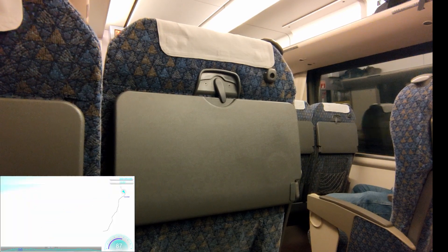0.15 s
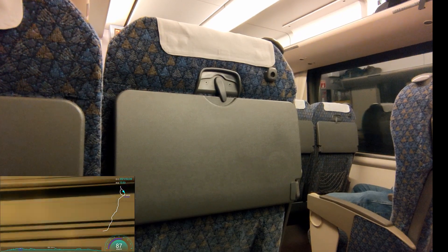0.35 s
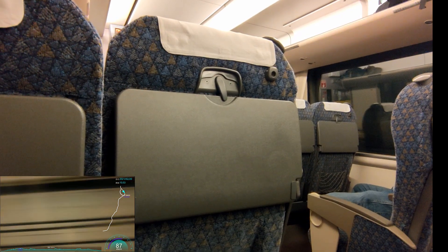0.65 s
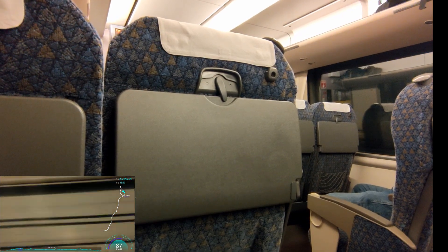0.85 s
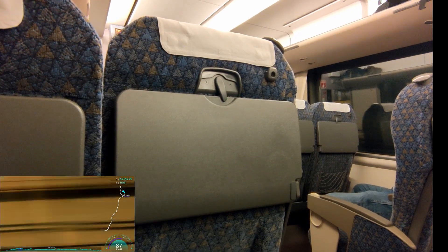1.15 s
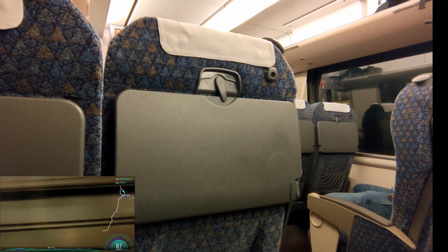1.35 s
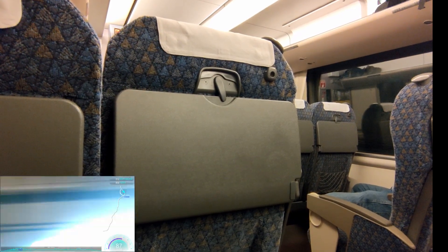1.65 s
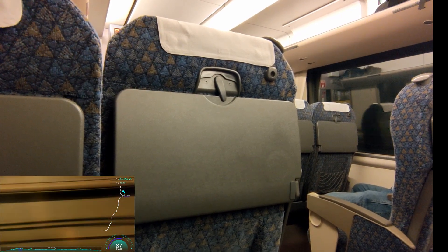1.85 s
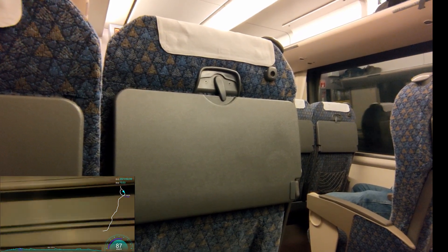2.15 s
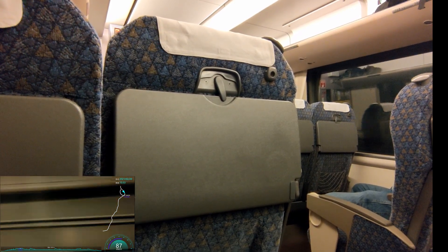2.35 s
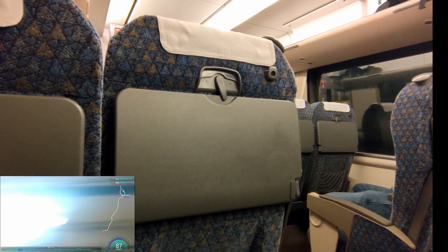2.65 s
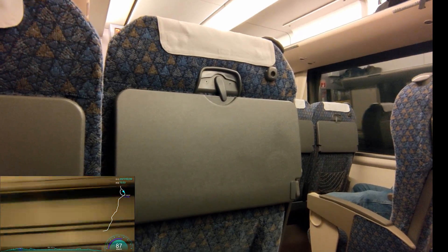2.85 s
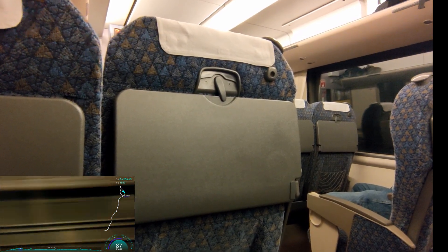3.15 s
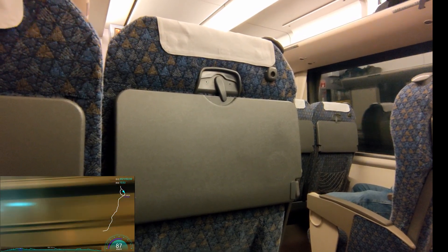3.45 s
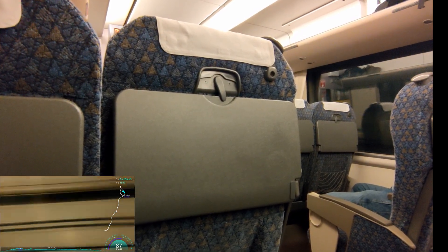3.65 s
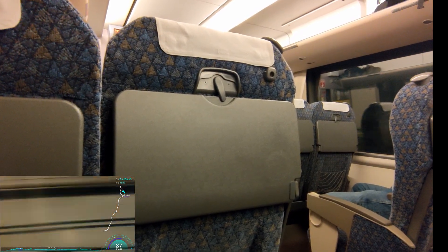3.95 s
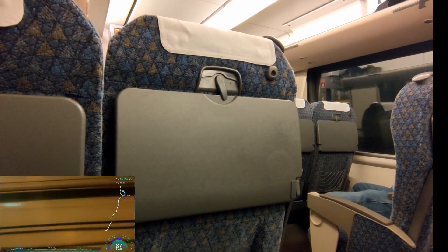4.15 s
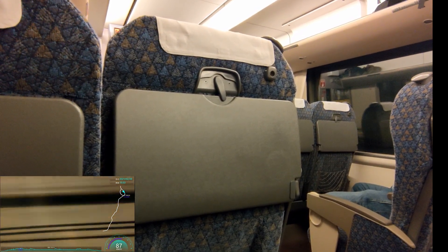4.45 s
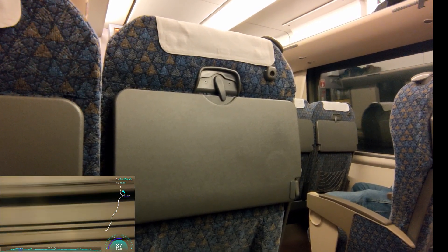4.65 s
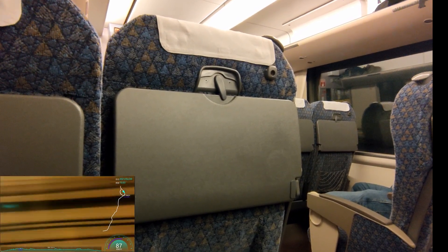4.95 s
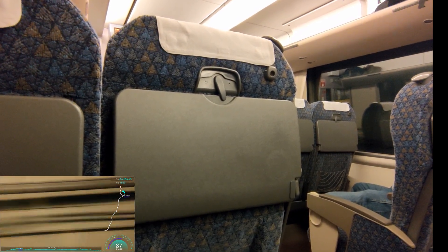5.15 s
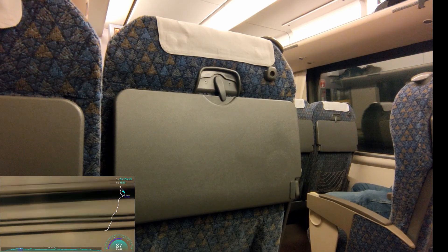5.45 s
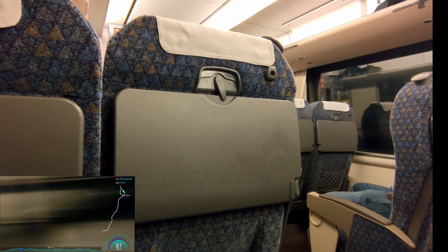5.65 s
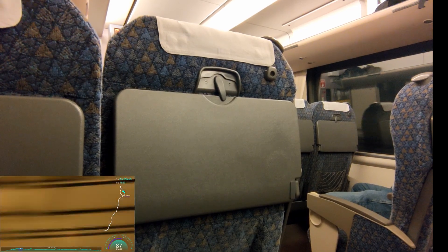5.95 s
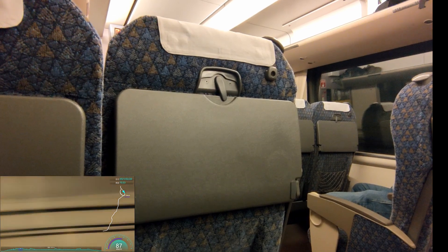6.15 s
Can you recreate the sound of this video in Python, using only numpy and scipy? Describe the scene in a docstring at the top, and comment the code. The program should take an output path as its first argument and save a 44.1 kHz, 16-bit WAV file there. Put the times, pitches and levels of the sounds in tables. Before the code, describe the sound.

Heard from a seat inside an enclosed passenger car at speed, wheels howl with a wavering midrange singing tone over deep body rumble. Worn rail makes the roar surge and groan, strongest just before two seconds, with scraping, a short rough squeal and a heavy soft knock. Further surges follow, then the howl thins and the ride smooths, leaving rumble, soft air hiss and dull knocks. Close stereo pickup, diffuse cabin sound.

```python
"""Inside a passenger car of a train at speed

Rail roughness drives the wheels and track, which roar and howl through the floor as shaped noise over a steady
body rumble; corrugated rail makes the howl sing as wavering tones, and the track gradually grows smoother.
Worn patches swell the roar and groan, some scrape and one squeals in rough, short tones. The bogie knocks
with decaying floor modes; booms, chirps and a tick are bursts of narrow noise, and faint squeaks sit in the hiss.
"""
import sys
import numpy as np
from scipy import signal
from scipy.fft import rfft, irfft, next_fast_len
from scipy.io import wavfile
from scipy.ndimage import uniform_filter1d, minimum_filter1d, map_coordinates

SR = 44100
rng = np.random.default_rng(int(sys.argv[2]) if len(sys.argv) > 2 else 0)


def int16_out(signal):
    """Quantize to a 16-bit WAV file."""
    q = np.round(np.clip(np.atleast_2d(signal).T, -1, 1) * 32767)
    wavfile.write(sys.argv[1], SR, q.astype(np.int16))


N = 277819
T = np.arange(N) / SR
FFT_SIZE = next_fast_len(N, real=True)
HZ = np.maximum(np.arange(FFT_SIZE // 2 + 1) * SR / FFT_SIZE, 1)
LEFT_RIGHT = np.array([[1], [-1]])  # sign of a difference between the ears


def undb(db):
    """Amplitude ratio: 20 dB is a factor of ten in gain."""
    return 10 ** (np.asarray(db) / 20)


def together(*levels_db):
    """Incoherent addition: the powers of unrelated sounds add; the result is in dB."""
    return 10 * np.log10(sum(undb(db) ** 2 for db in levels_db))


def unit(pair):
    """Normalisation: scale a stereo pair so that the mean of its ears has rms 1."""
    return pair / np.sqrt(np.mean(pair.mean(axis=0) ** 2))


def over_time(table, axis=1):
    """Linear interpolation: one column of a table whose first column is time."""
    columns = np.transpose(table)
    return np.interp(T, columns[0], columns[axis])


def over_hz(table, axis=1):
    """Spectral interpolation: one column of a table, joined on a log-frequency axis."""
    columns = np.transpose(table)
    return np.interp(np.log(HZ), np.log(columns[0]), columns[axis])


def resonance(hz, width_hz):
    """Damped mode with steep skirts: the gain halves about width_hz to either side of the centre."""
    detuning = (HZ ** 2 - hz ** 2) / (HZ * width_hz) / 2
    return 1 / (1 + detuning ** 2)


def walk(rate):
    """Smoothed random modulation: levels held 1 / rate s and slewed twice, with a spread of 1."""
    hold = int(SR / rate)
    steps = rng.standard_normal(1024)[np.arange(N) // hold % 1024]
    smooth = uniform_filter1d(uniform_filter1d(steps, hold), hold)
    return smooth / smooth.std()


def flare(centre_s, half_length_s):
    """Gaussian envelope: a gain that rises and falls in a bell around one moment."""
    return np.exp(-2 * ((T - centre_s) / half_length_s) ** 2)


def stretches(table, attack_s, release_s):
    """Exponential build-up and decay: level in dB as wheels run onto each stretch of rail and off again."""
    power = 1e-12
    for start_s, length_s, level_db in table:
        onto = 1 - np.exp(-np.maximum(T - start_s, 0) / attack_s)
        off = np.exp(-np.maximum(T - start_s - length_s, 0) / release_s)
        power = power + (undb(level_db) * onto * off) ** 2
    return 10 * np.log10(power)


def cabin_noise(gain):
    """Interaural coherence: random vibration of this spectrum, alike at the ears in the bass, diffuse above."""
    # standing waves of the cabin at the two ears: freq_hz, correlation (-1 to 1), left_minus_right_db
    cabin = [(40, 1, 4.5), (210, 0.88, 4), (290, 0.78, 1), (414, 0.49, 6.5), (500, 0.42, 3),
             (770, -0.016, 0), (920, 0.48, -0.5), (1215, -0.87, 5.5), (1900, 0.73, 0), (2450, -0.1, -1),
             (3200, 0.03, -3), (5700, -0.095, -3.5), (7700, -0.14, -9.5), (9100, -0.03, 18)]
    mid, side = rfft(rng.standard_normal((2, FFT_SIZE)))
    alike = np.clip(over_hz(cabin), -.9, .995)
    pair = mid + LEFT_RIGHT * side * np.sqrt((1 - alike) / (1 + alike))
    lean = undb(LEFT_RIGHT * over_hz(cabin, axis=2) / 2)
    spectrum = pair * gain * lean / lean.mean(axis=0)
    return unit(irfft(spectrum, FFT_SIZE)[:, :N])


def band(spectrum, level_db, even_s):
    """Averaging over many wheels: a group of resonances whose power is evened out over even_s."""
    noise = cabin_noise(undb(over_hz(spectrum)))
    window = int(even_s * SR) + 1
    power = np.mean(noise ** 2, axis=0)
    power = uniform_filter1d(uniform_filter1d(power, window), window)
    return unit(noise / np.sqrt(power)) * undb(level_db)


def shifting(pair, speed):
    """Variable-rate reading: move a sound's resonances up and down by a changing ratio."""
    place = np.cumsum(speed)
    return np.array([map_coordinates(ear, [place], order=1, mode="mirror") for ear in pair])


def singing(hz, pan_db, wander_hz):
    """Frequency and amplitude modulation: a wavering tone that sways between the ears as the car rocks."""
    flutter_db = 0.73 * walk(81)  # uneven ripples shake the tone
    turn = 2 * np.pi * np.cumsum(hz + wander_hz * walk(30)) / SR
    lag = 0.057 + 0.62 * walk(2.9)  # half the phase difference between the ears, radians
    return np.sqrt(2) * np.sin(turn + LEFT_RIGHT * lag) * undb(LEFT_RIGHT * pan_db / 2 + flutter_db)


def cries(table, jitter_hz, jitter_rate):
    """Unsteady tones: short pitches, some gliding, all jittered at random, that flare and fade."""
    out = np.zeros((2, N))
    for centre_s, half_length_s, pitch_hz, glide, level_db, pan_db in table:
        hz = pitch_hz + glide * (T - centre_s) + jitter_hz * walk(jitter_rate)
        out += singing(hz, pan_db, wander_hz=5) * flare(centre_s, half_length_s) * undb(level_db)
    return out


def swells(table):
    """Transient resonance: narrow bands of noise that flare and fade."""
    return sum(cabin_noise(resonance(hz, width_hz)) * flare(centre_s, half_length_s) * undb(level_db)
               for centre_s, half_length_s, hz, width_hz, level_db in table)


def track_roar(worn_db):
    """Forced vibration of rail and sleepers: a lumpy roar whose resonance shifts with track-bed stiffness."""
    # resonances of rail and sleepers: freq_hz, relative level_db per Hz
    spectrum = [(160, -44), (280, -14), (312, -9.5), (345, -5.5), (403, -3), (440, 3.5), (478, 5), (530, 3),
                (579, -5), (630, 0), (820, -49.5), (1390, -120)]
    # resonance of the roar along the track: time_s, centre_hz
    centre = [(0, 479), (.95, 463.9), (1.48, 478.8), (1.6, 444.8), (1.7, 496), (1.9, 488.8), (2.35, 499.3),
              (2.55, 463.7), (2.85, 476.8), (3.1, 486.3), (3.45, 434.6), (3.7, 479), (6.3, 471.6)]
    rest_hz = 477.8  # centre on average track
    roar = shifting(band(spectrum, 0, even_s=0.099), over_time(centre) / rest_hz)
    lumps_db = 1.1 * walk(37)  # flicker as the sleepers pass
    smooth_track_db = -29.5  # roar between the worn patches
    return unit(roar * undb(lumps_db)) * undb(together(smooth_track_db, worn_db))


def sleepers(worn_db):
    """Nonlinear growth: on badly worn track the sleepers bounce, a deep roar that grows faster than the wear."""
    noise = cabin_noise(resonance(hz=381, width_hz=79))
    return noise * undb(-0.5 + 1.367 * worn_db)


def wheel_howl(roughness_db, worn_db, tone_db, dip_db):
    """Energy sharing: roughness makes the wheels howl, and on corrugated rail the tone takes part of the power."""
    # howling resonances of the wheels: freq_hz, relative level_db per Hz
    spectrum = [(350, -41.5), (590, -17), (640, -3.5), (695, 2.5), (725, -0.5), (791, -4.5), (855, -6),
                (915, -15.5), (955, -24), (1005, -19), (1240, -46.5), (2090, -120)]
    howl_db = together(-16 + roughness_db, -9.5 + worn_db)  # heavy wear also drives the howl
    tone_share = np.minimum(undb(tone_db - howl_db) ** 2, .6)
    howl = band(spectrum, howl_db + dip_db, even_s=0.028) * np.sqrt(1 - tone_share)
    overtone = cabin_noise(resonance(hz=1421, width_hz=55)) * undb(howl_db - 27.5)
    return howl + overtone


def corrugation(tone_db):
    """Ripple-passing frequency: evenly spaced ripples make wheels sing at speed over spacing; two wheels beat."""
    # the tone sinks as the train loses a little speed, rises in part, and comes from either rail:
    # time_s, pitch_hz, left_minus_right_db
    sing = [(0, 718, -1.5), (.4, 718.8, 6.5), (.68, 717.7, 2.5), (.85, 718, 6), (1.5, 709.3, -2),
            (1.85, 712, -9), (2.1, 711, 7), (2.5, 710.6, -4), (3.55, 700, 4), (6.3, 709.6, 1)]
    hz, pan_db = over_time(sing), over_time(sing, axis=2)
    first = singing(hz, pan_db, wander_hz=4.54)
    second = singing(hz - 30.5, pan_db, wander_hz=16.1) * undb(-11.5)
    return (first + second) * undb(tone_db)


def wheel_ring(roughness_db, worn_db, scrape_db):
    """Modal vibration: roughness, wear and scraping excite a band of ringing, and wear a few narrow wheel modes."""
    # ringing band of the wheels: freq_hz, relative level_db per Hz
    spectrum = [(580, -29.5), (900, -0.5), (1000, 1.5), (1080, -1.5), (1160, -10), (1300, -13),
                (1400, -10.5), (1480, -5), (1700, -10), (1850, -9.5), (1970, -7.5), (2130, -9.5),
                (2400, -18), (2650, -17.5), (3510, -51), (5940, -120)]
    # narrow ringing modes: freq_hz, width_hz, relative level_db
    modes = [(1400, 46, -1.5), (2730, 45, -7.5), (2888, 61, -2.5), (2985, 180, -4.5)]
    # level of those modes between worn patches: time_s, level_db
    mode_level = [(0, -47), (1.6, -46.5), (3.1, -51), (6.3, -50.5)]
    ring_db = together(-36 + 0.26 * roughness_db, -15.5 + worn_db, 15 + scrape_db)
    mode_db = together(over_time(mode_level), -31 + worn_db)
    ringing = sum(cabin_noise(resonance(hz, width_hz)) * undb(db) for hz, width_hz, db in modes)
    return band(spectrum, ring_db, even_s=.26) + ringing * undb(mode_db)


def hiss(roughness_db, worn_db, scrape_db):
    """Broadband noise: contact noise follows roughness, wear and scraping over a constant rush of air."""
    # air and contact noise: freq_hz, relative level_db per Hz
    spectrum = [(1850, -29.5), (3150, -7.5), (3410, -9), (3730, -6), (4250, -13), (4660, -9.5),
                (5160, -15.5), (6340, -18), (6930, -13.5), (7600, -15), (8870, -22), (9600, -41),
                (12500, -61.5), (21100, -120)]
    air_db = -58
    hiss_db = together(air_db, -53 + .7 * roughness_db, -43.5 + worn_db, scrape_db)
    return band(spectrum, hiss_db, even_s=.2)


def scrape_level():
    """Rough contact: level in dB of the hiss that broad scrapes add on some worn patches."""
    # scraping stretches: start_s, length_s, level_db
    scrapes = [(1.66, 0.11, -51.5), (1.765, 0.064, -49.5), (1.84, 0.076, -58), (2.68, 0.082, -58),
               (3.7, 0.1, -60)]
    return stretches(scrapes, attack_s=.015, release_s=0.035)


def wear_level():
    """Excitation by wear: level in dB of the roar that the worn patches add."""
    # worn patches of track: start_s, length_s, level_db of the roar
    worn = [(0, 0.21, -28.5), (.56, 0.47, -25.5), (.92, 0.066, -22.5), (1.39, 0.33, -21.5),
            (1.64, 0.23, -18), (2.26, 0.24, -18.5), (2.62, 0.19, -19.5), (2.98, 0.071, -26.5),
            (3.33, 0.28, -23.5), (3.7, 0.16, -28.5)]
    return stretches(worn, attack_s=0.035, release_s=0.25)


def tone_level(roughness_db):
    """Excitation by ripples: the tone rises faster than roughness and swells on corrugated stretches."""
    # corrugated stretches of rail: start_s, length_s, level_db of the tone
    ripples = [(.032, .012, -14), (.105, 0.042, -14.5), (.156, 0.018, -11), (.192, 0.031, -10.5),
               (.272, 0.03, -18), (.343, 0.011, -8), (.36, 0.12, -15.5), (.478, .012, -17),
               (.514, 0.0091, -5.5), (.54, 0.012, -8), (.635, 0.1, -12), (.737, 0.0098, -11),
               (.772, .035, -12.5), (.822, .045, -15), (1.028, 0.038, -19), (1.178, .013, -11),
               (1.28, 0.011, -12), (1.47, 0.048, -20), (1.655, .03, -20), (1.78, 0.14, -26),
               (2.03, .135, -16), (2.58, 0.036, -19.5), (2.82, 0.058, -28), (3.206, 0.015, -11),
               (3.525, 0.018, -18), (3.585, 0.041, -15.5), (4.093, 0.011, -11.5), (4.15, 0.036, -20.5),
               (4.25, 0.015, -20), (4.787, 0.013, -17.5)]
    return together(-23 + 1.62 * roughness_db, stretches(ripples, attack_s=0.007, release_s=0.005))


def howl_dips():
    """Amplitude modulation: the howl and its tone dip briefly, in dB."""
    # brief dips: centre_s, half_length_s, depth_db
    dips = [(0.079, 0.038, -5.5), (0.263, 0.018, -5.5), (0.334, 0.0093, -2), (0.51, 0.0073, -10.5),
            (0.54, 0.0037, -1), (0.946, 0.036, -5.5), (1.168, 0.0079, -8), (1.952, 0.027, -4),
            (2.94, 0.015, -2), (3.194, 0.018, -6), (3.505, .014, -2.5), (4.315, 0.052, -4)]
    return sum(depth_db * flare(centre_s, half_length_s) for centre_s, half_length_s, depth_db in dips)


def rolling():
    """Roughness excitation: the state of the rail drives roar, howl, tone, ring and hiss together."""
    # fine roughness of the rail: time_s, roughness_db
    roughness = [(0, 1.5), (.75, -1), (1.35, -3.5), (2.8, -4.5), (3.7, -6.5), (4.15, -7.5), (5.7, -14.5),
                 (6.3, -15.5)]
    # which rail is rougher: time_s, left_minus_right_db
    sway = [(0, 0.5), (1.45, 1.5), (1.75, -2.5), (2.1, 1.5), (2.5, 1), (3, 2), (6.3, 2)]
    roughness_db, worn_db, scrape_db = over_time(roughness), wear_level(), scrape_level()
    tone_db, dip_db = tone_level(roughness_db), howl_dips()
    low = track_roar(worn_db) + sleepers(worn_db)
    middle = wheel_howl(roughness_db, worn_db, tone_db, dip_db) + corrugation(tone_db + dip_db)
    high = wheel_ring(roughness_db, worn_db, scrape_db) + hiss(roughness_db, worn_db, scrape_db)
    return undb(LEFT_RIGHT * over_time(sway) / 2) * (low + middle + high)


def groans():
    """Forced vibration at long wavelength: long ripples on the worn patches make a wheel groan."""
    # groans: centre_s, half_length_s, pitch_hz, glide_hz_per_s, level_db, left_minus_right_db
    table = [(.99, 0.04, 462.4, -0.5, -20, 11), (1.52, 0.1, 471, 300, -19.5, 6),
             (1.63, 0.042, 438, 498, -18, 8.5), (1.9, .045, 503, -300, -21, 1.5),
             (2.35, 0.039, 466.6, 1, -18.5, 2), (2.47, 0.069, 481, -0.5, -17.5, 5),
             (2.71, 0.027, 472.9, -300, -22, 5)]
    return cries(table, jitter_hz=5.97, jitter_rate=60)


def squeals_and_squeaks():
    """Stick-slip friction: irregular slipping roughens the pitch of wheel squeals and of squeaking fittings."""
    # wheels on the most worn patch: centre_s, half_length_s, pitch_hz, glide_hz_per_s, level_db,
    # left_minus_right_db
    squeals = [(1.712, 0.039, 1948, -0.5, -33, -2), (1.782, .02, 1400, -0.5, -36, 2),
               (1.805, .014, 2030, -4000, -39, 2), (1.805, 0.032, 2876, -0.5, -34, -1)]
    # faint squeaks of the fittings: the same columns
    squeaks = [(0.173, .11, 7675, 0.0048, -61, -9), (.34, .09, 4440, 0, -57.5, -13)]
    return cries(squeals + squeaks, jitter_hz=55, jitter_rate=400)


def knocks(push_s=0.0097):
    """Modal impact response: soft bogie blows come up through the suspension and ring the floor panel."""
    # bogie knocks: start_s, level_db
    blows = [(.227, -26.5), (.675, -23.5), (1.117, -25), (1.708, -10.5), (1.845, -18), (1.9, -23),
             (2.53, -20), (2.727, -20), (2.907, -18.5), (3.942, -18.5), (4.42, -23), (5.72, -22),
             (6.096, -17.5), (6.163, -21), (6.263, -17.5)]
    # modes of the floor: freq_hz, t60_s, relative level_db
    floor = [(173.7, 0.19, -14.5), (214.3, 0.44, -10.5), (275.9, 0.19, 2.5), (310, 0.3, -10.5)]
    t = T[:SR // 3]
    ring = sum(undb(mode_db - 60 * t / t60_s) * np.sin(2 * np.pi * hz * t) for hz, t60_s, mode_db in floor)
    soft_ring = ring * (1 - np.exp(-(t / push_s) ** 2))
    out = np.zeros(N)
    for start_s, level_db in blows:
        at = int(start_s * SR)
        out[at:at + len(t)] += (undb(level_db) * soft_ring)[:N - at]
    return out


def booms():
    """Low-frequency resonance: the car body booms in brief narrow bands of noise."""
    # booms: centre_s, half_length_s, freq_hz, width_hz, level_db
    table = [(1.828, .12, 160, 45.2, -33.5), (4.841, 0.2, 85.14, 29.97, -33),
             (5.55, 0.26, 209.4, 45.5, -34.5)]
    return swells(table)


def chirps_and_tick():
    """Brief band-limited noise: faint high chirps and a light, broader tick."""
    # chirps: centre_s, half_length_s, freq_hz, width_hz, level_db
    chirps = [(.04, .08, 6900, 200, -54), (.054, 0.2, 8370, 404, -58.5)]
    # a light tick: the same columns
    ticks = [(4.44, .027, 7900, 2200, -54)]
    return swells(chirps + ticks)


def body():
    """Vibration isolation: the sprung body rumbles evenly and its panels drone, whatever the track does."""
    # body rumble: freq_hz, relative level_db per Hz
    rumble = [(12, 7.5), (22, 5), (32, 2), (41, 5.5), (57, 3), (100, -2), (124, -4), (150, -3.5), (183, -4),
              (269, -2), (300, -3.5), (390, -25.5), (660, -120)]
    # droning panels: freq_hz, width_hz, level_db
    panels = [(164.3, 9.9, -45), (224.3, 30, -39), (350.4, 28, -39.5), (483.8, 13, -36.5),
              (1066, 55, -48.5)]
    drone = sum(cabin_noise(resonance(hz, width_hz)) * undb(db) for hz, width_hz, db in panels)
    # the air springs hold back the very lowest shaking
    springs = signal.butter(2, Wn=12, btype="high", fs=SR, output="sos")
    return drone + signal.sosfilt(springs, band(rumble, -30, even_s=0.24))


def scene():
    """Superposition: rolling noise, unsteady tones, small events and the car body add at the ears."""
    tones = groans() + squeals_and_squeaks()
    events = knocks() + booms() + chirps_and_tick()
    return rolling() + tones + events + body()


def record(dry):
    """Peak limiting and band limiting: duck the highest peaks, ease the ends and cut the top steeply."""
    top_hz, ceiling, fade_s = 9350, .8, .003
    room = np.minimum(1, ceiling / (np.abs(dry).max(axis=0) + 1e-9))
    # hold each reduction around its peak, then smooth it
    held = minimum_filter1d(room, size=801)
    gain = uniform_filter1d(uniform_filter1d(held, size=401), size=401)
    ends = np.minimum(1, np.minimum(T, T[::-1]) / fade_s)
    top_cut = signal.ellip(10, .2, 80, top_hz, fs=SR, output="sos")
    return signal.sosfilt(top_cut, dry * gain * ends)


dry = scene()
out = record(dry)
int16_out(out)
```